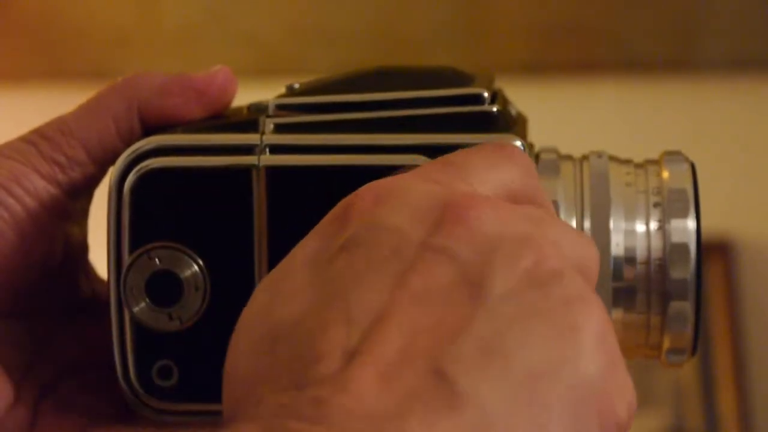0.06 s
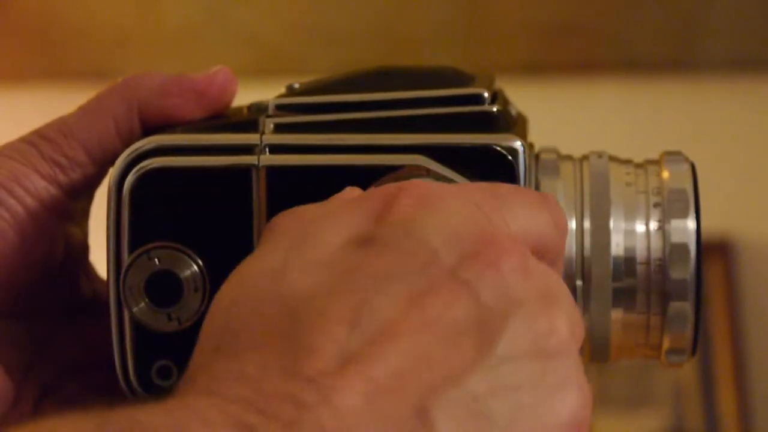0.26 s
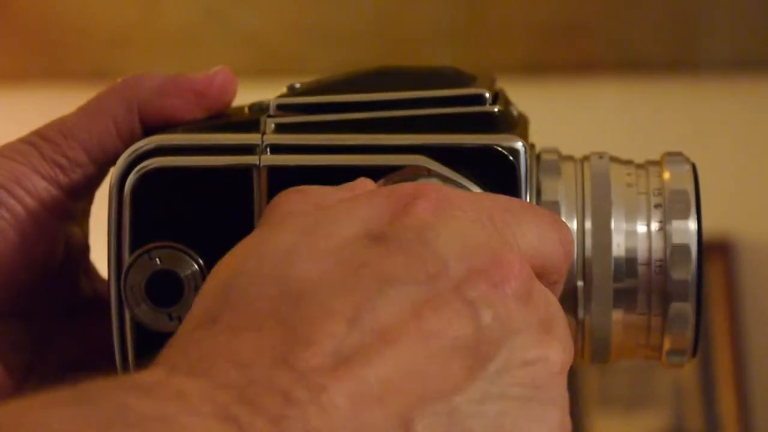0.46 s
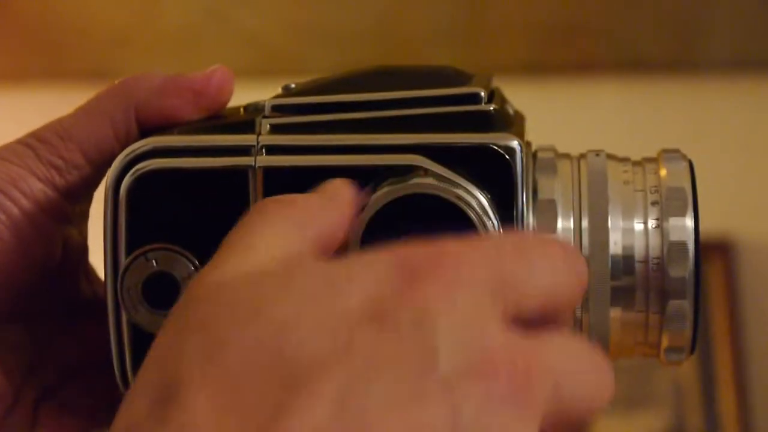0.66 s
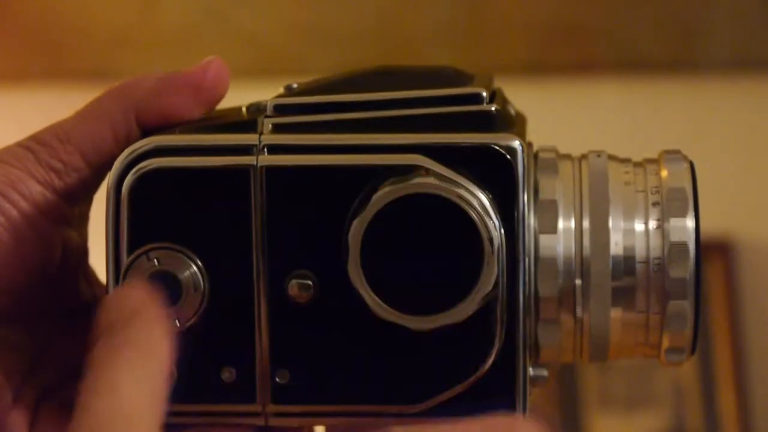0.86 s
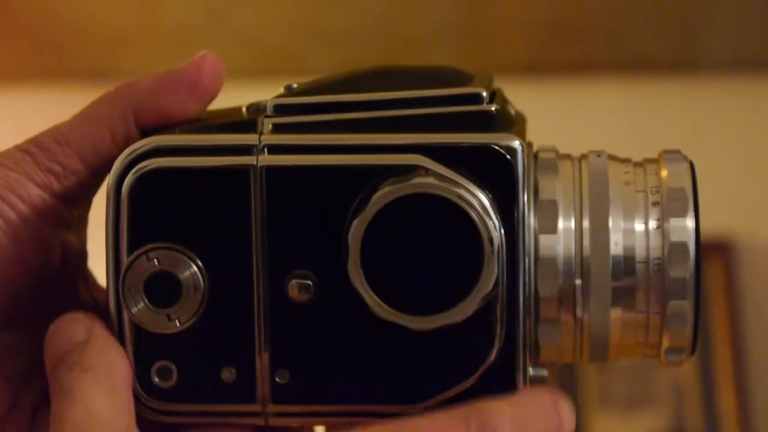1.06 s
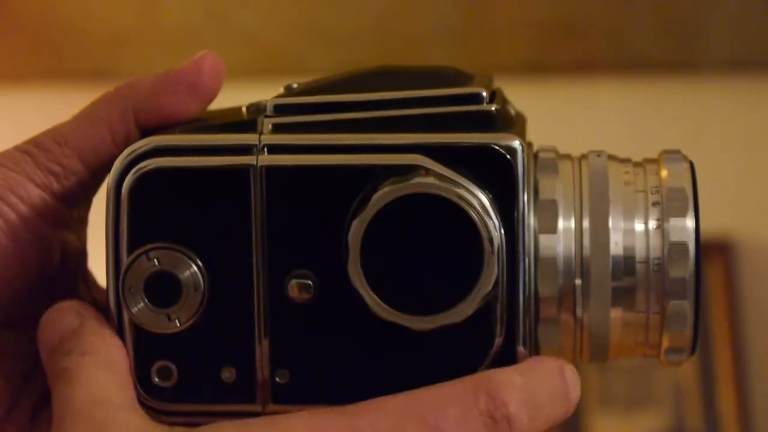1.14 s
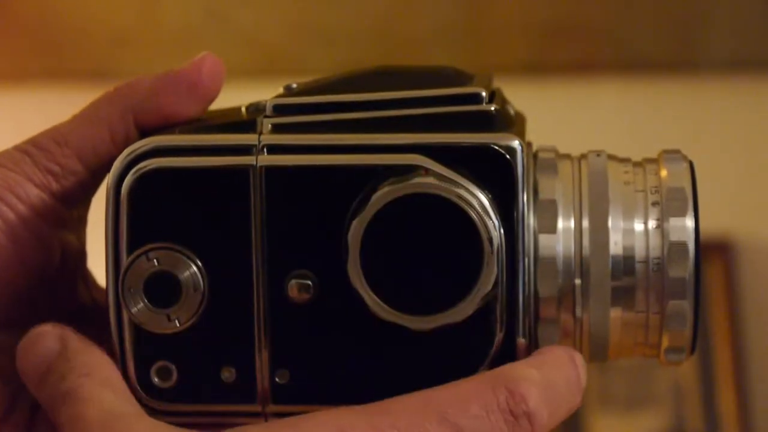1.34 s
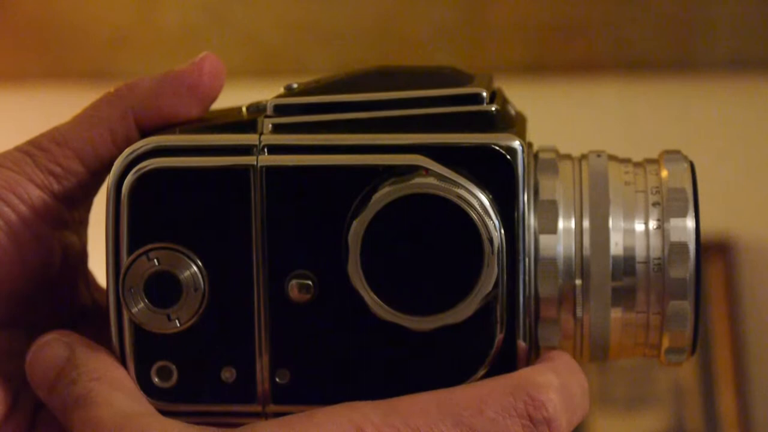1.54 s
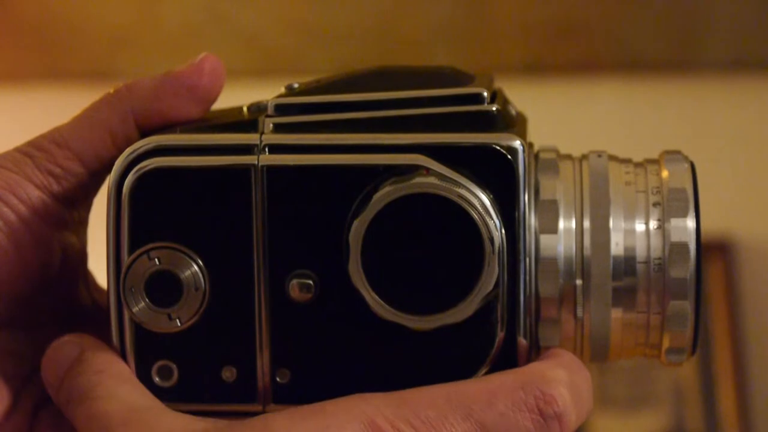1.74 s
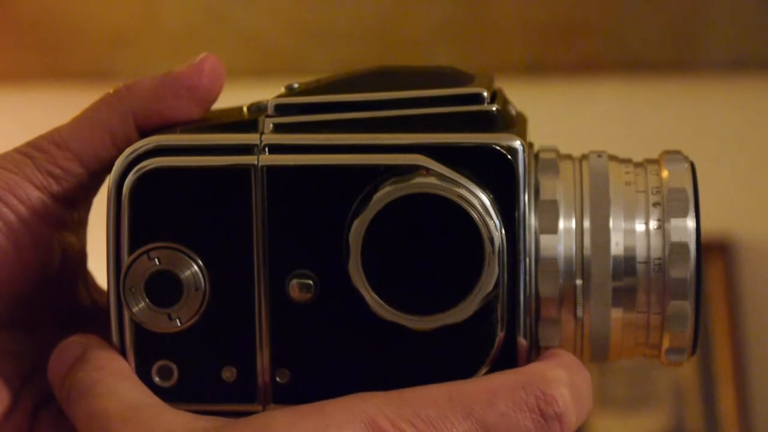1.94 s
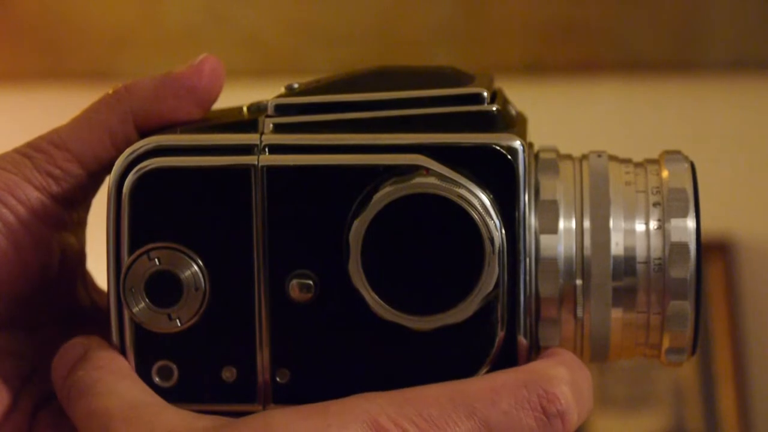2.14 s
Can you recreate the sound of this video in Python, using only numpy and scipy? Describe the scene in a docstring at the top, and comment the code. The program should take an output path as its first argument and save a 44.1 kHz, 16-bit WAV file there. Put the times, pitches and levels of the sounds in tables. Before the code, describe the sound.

An old film camera fires once with a loud clack: a brief spring whirr, then mirror and shutter snapping in quick succession. Faint finger ticks follow over a soft hum, heard close in a small, echoing room.

```python
"""A small live room: an old medium-format film camera is fired once, close by.
The hand tightens, the release slides in and trips a latch, the spring drive whirrs,
the mirror hits its stop and rings, and the shutter flaps slam and rattle; both hits echo sharply.
Fingers then shift on the body with faint ticks, over mains hum and soft background noise."""
import sys
import numpy as np
from scipy import signal
from scipy.fft import rfft, irfft
from scipy.io import wavfile

SR = 44100
rng = np.random.default_rng(int(sys.argv[2]) if len(sys.argv) > 2 else 0)


def transcribe(signal):
    """Save signal, clipped to [-1, 1], as a 16-bit WAV file at the path in sys.argv[1]."""
    frames = np.atleast_2d(signal).T
    limited = np.clip(frames, -1, 1)
    pcm = np.round(limited * 32767).astype(np.int16)
    wavfile.write(sys.argv[1], SR, pcm)


N = 97020
T, HZ = np.arange(N) / SR, np.fft.rfftfreq(N, 1 / SR)
BURST_N = 16384
BURST_T, BURST_HZ = np.arange(BURST_N) / SR, np.fft.rfftfreq(BURST_N, 1 / SR)


def amp(db):
    """Decibels to gain."""
    return 10 ** (np.asarray(db) / 20)


def unit_rms(x):
    """Scale to rms 1."""
    return x / np.sqrt(np.mean(x ** 2) + 1e-20)


def curve(points, hz):
    """Interpolate points on a log-frequency axis."""
    point_hz, value = np.transpose(points)
    return np.interp(np.log(hz + 1), np.log(point_hz + 1), value)


def correlate_pair(spectra, correlation):
    """Give two independent spectra a left-right correlation."""
    c = np.clip(correlation, -1, 1)
    return np.array([spectra[0], c * spectra[0] + np.sqrt(1 - c ** 2) * spectra[1]])


def coloured(x, curve_db):
    """Minimum-phase filter with the given gain curve."""
    cepstrum = irfft(np.log(amp(curve_db)))[:BURST_N // 2]
    cepstrum[1:] *= 2
    return irfft(rfft(x) * np.exp(rfft(cepstrum, BURST_N)))


def add(mix, start_s, sound):
    """Mix a sound in at start_s."""
    part = mix[:, max(round(start_s * SR), 0):][:, :sound.shape[-1]]
    part += sound[..., :part.shape[1]]


def chatter(rise_s, hold_s, decay_s, level_db, curve_db):
    """Stereo burst of dense tiny impulses and hiss, wider in the treble."""
    impulses_per_s, spread_db, width, wide_above_hz = 5000, 4.5, .25, 2500
    envelope = np.minimum(BURST_T / rise_s, 1)
    envelope *= np.exp(-np.maximum(BURST_T - rise_s - hold_s, 0) / decay_s)
    strength, mid_hiss, side_hiss = rng.standard_normal((3, BURST_N))
    hits = rng.random(BURST_N) < impulses_per_s / SR
    impulses = hits * np.sign(mid_hiss) * amp(spread_db * strength)
    mid, side = coloured(envelope * np.array([unit_rms(impulses) + mid_hiss, side_hiss]), curve_db)
    side = signal.lfilter(*signal.butter(1, wide_above_hz, "high", fs=SR), unit_rms(side))
    stereo = unit_rms(mid) + width * np.array([[1], [-1]]) * side
    return amp(level_db) * np.sqrt(np.mean(envelope ** 2)) * stereo


def bursts(rows, colour):
    """Timed bursts of chatter, each with one broad spectral peak."""
    sigma_octaves = .28
    out = np.zeros((2, N))
    for start_s, rise_s, hold_s, decay_s, level_db, peak_hz, lift_db in rows:
        octaves = np.log2((BURST_HZ + 1) / peak_hz)
        curve_db = curve(colour, BURST_HZ) + lift_db * np.exp(-.5 * (octaves / sigma_octaves) ** 2)
        add(out, start_s, chatter(rise_s, hold_s, decay_s, level_db, curve_db))
    return out


def clicks(rows, colour):
    """Sharp bursts: 0.1 ms rise, no hold."""
    return bursts([(start_s, .0001, 0, decay_s, level_db, peak_hz, lift_db)
                   for start_s, level_db, decay_s, peak_hz, lift_db in rows], colour)


def ring(modes, rise_s):
    """Decaying modes after a blow."""
    tones = sum(amp(level_db - 60 * BURST_T / t60_s) * np.sin(2 * np.pi * pitch_hz * BURST_T)
                for pitch_hz, level_db, t60_s in modes)
    return (1 - np.exp(-BURST_T / rise_s)) * tones


def noise(gain, correlation):
    """Steady stereo noise with the given spectrum."""
    real, imag = rng.standard_normal((2, 2, len(HZ)))
    return irfft(correlate_pair(real + 1j * imag, correlation) * gain, N) * np.sqrt(N / 2)


def background():
    """Room air, mains hum and narrow noise bands whose weight shifts upward."""
    # noise bands: centre_hz, width_hz, early_db, late_db
    bands = [(550, 110, -68, -84.5), (730, 70, -66.5, -67.5), (810, 80, -66, -66), (923, 80, -76.5, -66.5),
             (982, 50, -77, -66.5), (1110, 150, -76.5, -68)]
    # mains harmonics: pitch_hz, level_db
    harmonics = [(50, -70.5), (100, -71), (200, -77.5)]
    # air spectrum: freq_hz, relative_db
    air_colour = [(25, -13.5), (70, -8.5), (150, -5), (330, -3), (550, -7), (1000, -7.5), (1600, -9),
                  (2500, -11.5), (6000, -12.5), (10000, -17.5), (15500, -22)]
    # air, left against right: freq_hz, correlation
    air_correlation = [(50, 0.919), (200, .8), (500, -0.17), (1000, 0.63), (1600, -.55), (4000, -.58),
                       (7000, -0.5), (13000, -.1)]
    air_db, band_correlation, shift_start_s, shift_end_s = -59.5, .78, .71, .88
    shapes = np.array([unit_rms(1 / (1 + ((HZ - centre_hz) / width_hz * 2) ** 2))
                       for centre_hz, width_hz, _, _ in bands])
    early, late = np.sqrt(amp(np.array(bands)[:, 2:].T) ** 2 @ shapes ** 2)
    shift = np.interp(T, [shift_start_s, shift_end_s], [0, 1])
    band_noise = np.sqrt(1 - shift) * noise(early, band_correlation)
    band_noise += np.sqrt(shift) * noise(late, band_correlation)
    hum = sum(amp(db) * np.sqrt(2) * np.sin(2 * np.pi * (hz * T + rng.random())) for hz, db in harmonics)
    air = noise(amp(air_db) * unit_rms(amp(curve(air_colour, HZ))), curve(air_correlation, HZ))
    return air + band_noise + hum


def grip():
    """The hand tightens; skin rubs the body with a dull boom."""
    # rubs: start_s, rise_s, hold_s, decay_s, level_db, peak_hz, lift_db
    rubs = [(.0, 0.048, .13, .02, -62, 310, 7), (.17, .05, .04, .015, -55, 130.3, 11.5),
            (1.923, 0.0022, .008, .015, -64.5, 457, 13)]
    # rub spectrum: freq_hz, relative_db
    colour = [(40, -16.5), (110, -4), (300, -3), (800, -5), (2000, -20.5), (6000, -20.5), (16000, -29.5)]
    return bursts(rubs, colour)


def mechanism():
    """The release slides, the spring drive runs, parts rattle."""
    # moving parts: start_s, rise_s, hold_s, decay_s, level_db, peak_hz, lift_db
    runs = [(.1235, .001, .004, .006, -47, 11500, 3), (.130, .004, .009, .005, -42.5, 6800, 4.5),
            (.171, 0.0011, 0.018, 0.013, -50, 3598, 7.5), (.172, .002, .028, .01, -51.5, 1250, 15.5),
            (.217, .008, .003, .003, -42, 14500, 4.5), (.230, 0.0053, .006, .004, -22, 6500, 4),
            (.244, .004, .013, .003, -20.5, 4608, 1.5), (.319, 0.0052, 0.0018, 0.0021, -23, 14000, 3),
            (.3315, .001, 0.011, 0.0021, -23, 7200, 8.5)]
    # running spectrum: freq_hz, relative_db
    colour = [(30, -46.5), (60, -34.5), (160, -12), (260, -25.5), (420, -8), (700, -17.5), (1700, -3.5),
              (2600, -4.5), (4500, 0.5), (7000, -1), (10500, -5.5), (14500, -3), (16000, -6)]
    return bursts(runs, colour)


def latches_and_echoes():
    """Latch clicks, then sharp early room echoes of the mirror hit and the shutter slam."""
    # three clicks, then three echoes: start_s, level_db, decay_s, peak_hz, lift_db
    events = [(.1670, -33.5, .0035, 3510, 8.5), (.2285, -29, .0012, 6300, 8.5),
              (.2569, -21, .0005, 5200, 2.5), (.2706, -22, .0015, 1817, 7.5),
              (.2745, -19.5, .0015, 4800, 9), (.3488, -26.5, .0012, 7200, 8.5)]
    # click and echo spectrum: freq_hz, relative_db
    colour = [(100, -21), (400, -10), (1300, 2.5), (2200, 2.5), (4700, 1.5), (6500, -4.5), (10000, -6),
              (16000, -13)]
    return clicks(events, colour)


def mirror():
    """The mirror cracks against its stop and bounces; its frame rings."""
    # hits on the stop: start_s, ring_db, crack_db
    hits = [(.2616, -8, -9.5), (.2623, -1.5, -20), (.3083, -16, -44.5)]
    # crack spectrum: freq_hz, relative_db
    colour = [(60, -15), (150, -18), (400, -16.5), (1100, 0.5), (2500, -0.5), (4500, 6), (7000, 0),
              (12000, -4.5), (16000, -7)]
    # frame modes: pitch_hz, relative_db, t60_s
    modes = [(4506, 0, 0.0068), (1800, -41, .15), (2570, -28.5, .13), (4230, -39.5, .14), (4490, -37, .14),
             (4710, -37, 0.14), (4733, -32.5, 0.25), (5227, -37, .16), (5660, -39.5, .14)]
    out, frame = np.zeros((2, N)), ring(modes, rise_s=.00015)
    for start_s, ring_db, crack_db in hits:
        crack = chatter(rise_s=.0001, hold_s=0, decay_s=.003, level_db=crack_db,
                        curve_db=curve(colour, BURST_HZ))
        add(out, start_s, crack + amp(ring_db) * frame)
    return out


def shutter_flaps():
    """The flaps slam and set the hollow body booming."""
    # slam spectrum: freq_hz, relative_db
    colour = [(30, -47), (80, -30), (250, -9.5), (480, 7), (720, -5.5), (1050, -1), (1500, -4), (2600, -1),
              (4500, 2.5), (7000, 4), (12000, -1), (16000, -17.5)]
    # body modes: pitch_hz, level_db, t60_s
    modes = [(141, -43, 0.22), (159, -41, .23), (443, -48, .16), (530, -41, 0.092), (2570, -50, .45)]
    slam = chatter(rise_s=.00012, hold_s=.0018, decay_s=.0017, level_db=-15.5,
                   curve_db=curve(colour, BURST_HZ))
    out = np.zeros((2, N))
    add(out, start_s=.3244, sound=slam + ring(modes, rise_s=.006))
    return out


def fingers():
    """Shifting fingers tick on the body."""
    # touches: start_s, level_db, decay_s, peak_hz, lift_db
    touches = [(.661, -58.5, .008, 2717, 18), (1.218, -63.5, .015, 5000, 7), (1.5535, -60, .006, 4000, 7),
               (1.6125, -53.5, 0.0059, 5000, 2), (1.6342, -49, 0.0028, 3680, 12),
               (1.645, -61, 0.016, 3300, 9), (1.9232, -48.5, 0.0043, 12500, 11),
               (1.926, -59.5, 0.011, 5460, 12)]
    # tick spectrum: freq_hz, relative_db
    colour = [(100, -1), (350, 5), (800, 0), (1700, 10), (2600, -0.5), (5000, 2), (9000, 0), (16000, -2.5)]
    return clicks(touches, colour)


def room(x):
    """Echoes off near surfaces and a diffuse tail whose treble dies first."""
    # near surfaces: delay_s, left_db, right_db
    echoes = [(.0021, -11.5, -16), (.0086, -15, -13), (0.0124, -19, -17.5), (.0245, -16, -18.5)]
    # tail decay: freq_hz, t60_s
    decay = [(100, .36), (500, .47), (1500, 0.54), (2700, 0.51), (4400, .49), (7000, 0.41), (10000, 0.34),
             (15000, 0.24)]
    # tail spectrum: freq_hz, gain_db
    colour = [(100, -4.5), (450, 1.5), (1200, -2.5), (2200, -1.5), (2650, 3), (3300, -1), (4400, -2.5),
              (7000, 1.44), (10000, 1), (15000, -1.5)]
    # tail, left against right: freq_hz, correlation
    correlation = [(150, 1), (500, 1), (1100, 0.98), (1800, .5), (4000, .25), (15000, .05)]
    size, rise_s = 2 * BURST_N, .005
    band_hz, time_s, frames = signal.stft(rng.standard_normal((2, size)), SR, nperseg=256)
    t60_s = curve(decay, band_hz)[:, None]
    unit_energy = np.sqrt(2 * np.log(1000) / t60_s / SR)
    tail = signal.istft(frames * amp(-60 * time_s / t60_s) * unit_energy, SR)[1][:, :size]
    tail *= 1 - np.exp(-T[:size] / rise_s)
    hz = np.fft.rfftfreq(size, 1 / SR)
    spectra = correlate_pair(rfft(tail), curve(correlation, hz)) * amp(curve(colour, hz))
    response = irfft(spectra)[:, :SR // 2]
    for delay_s, left_db, right_db in echoes:
        response[[0, 1], round(delay_s * SR) + rng.integers(0, 8, size=2)] += amp([left_db, right_db])
    return signal.fftconvolve(x, response, axes=1)[:, :N]


def scene():
    """Camera slightly left of centre; its sound sways between two sets of room paths."""
    balance_db, sway_hz = 1.4, 5
    near = mechanism() + latches_and_echoes() + mirror() + shutter_flaps() + grip() + fingers()
    direct = near * amp([[balance_db / 2], [-balance_db / 2]])
    send, sway_rad = near.mean(0)[None], 2 * np.pi * sway_hz * T
    reverb = room(send * np.cos(sway_rad)) + room(send * np.sin(sway_rad))
    return direct + reverb + background()


def record(dry):
    """Soft peak rounding, then a low-pass."""
    ceiling, cutoff_hz = .9, 15900
    rounded = dry / (1 + (dry / ceiling) ** 6) ** (1 / 6)
    lowpass = signal.firwin(511, cutoff_hz, window=("kaiser", 9), fs=SR)
    return signal.oaconvolve(rounded, lowpass[None], "same")


dry = scene()
out = record(dry)
transcribe(out)
```